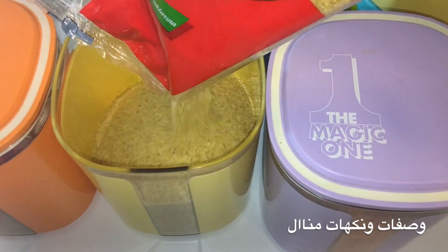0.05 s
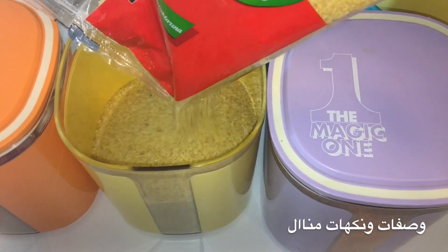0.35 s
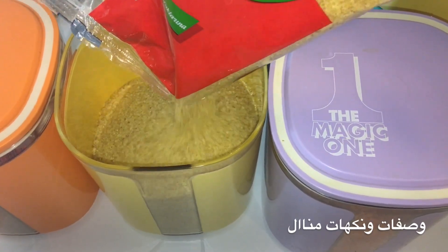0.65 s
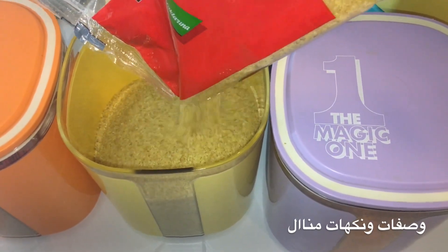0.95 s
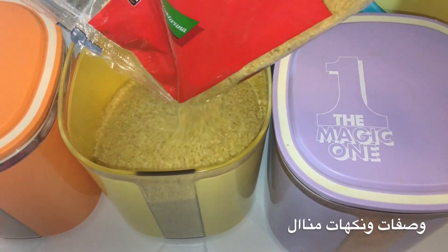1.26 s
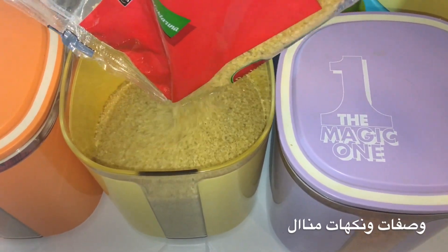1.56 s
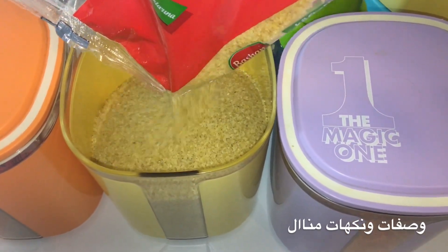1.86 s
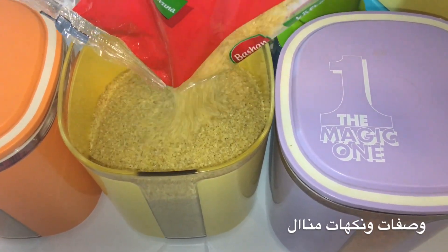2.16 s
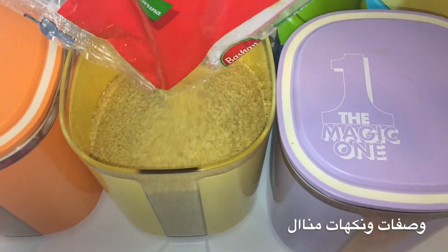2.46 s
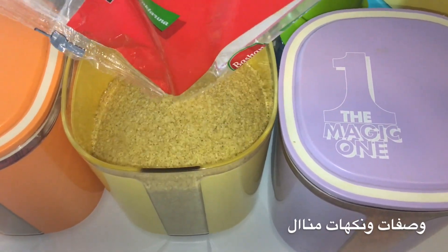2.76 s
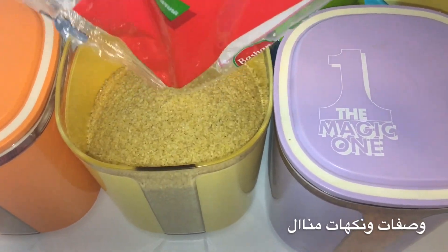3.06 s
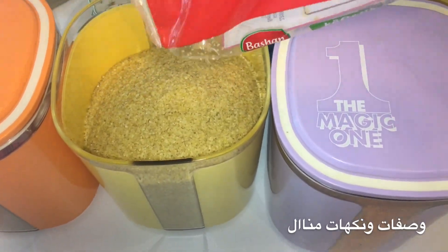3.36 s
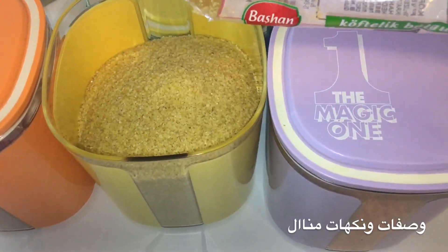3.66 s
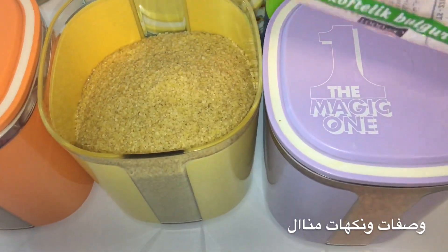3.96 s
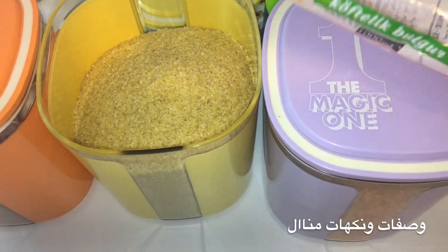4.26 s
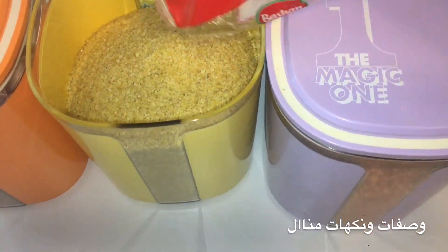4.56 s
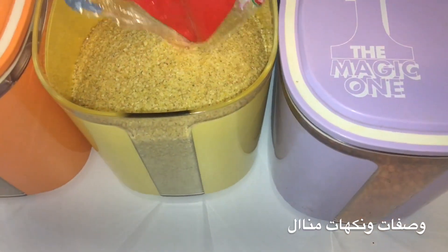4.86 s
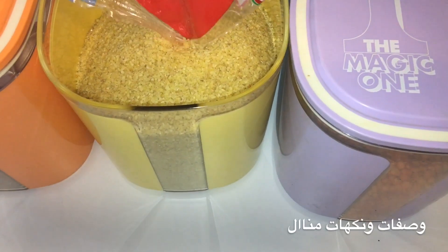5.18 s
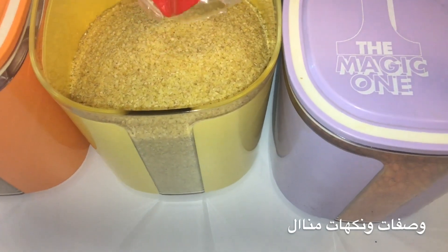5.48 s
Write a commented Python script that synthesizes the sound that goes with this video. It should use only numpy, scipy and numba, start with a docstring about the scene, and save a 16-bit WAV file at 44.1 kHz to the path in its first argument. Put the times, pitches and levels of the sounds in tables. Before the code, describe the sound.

In a small kitchen with little echo, a stream of dry grain hisses into a plastic canister while more slides along the inside of a plastic bag, which snaps now and then. The pour fades and crinkling takes over: irregular jolts of the slack bag, with bright crackles, soft flaps and short spurts of leftover grain. The crackling is strongest near the end, then dies down.

```python
"""In a small kitchen, fine dry grain pours from a plastic bag onto the heap in a plastic canister.
Countless impacts merge into a hiss, and sliding grain drives the resonances of the bag wall.
The stream thins out; the bag is lifted and jolted, and the last grain rustles over the film.
As the bag empties, its slack walls flop and its creases buckle with snaps and crackles.
The room adds faint reverberation, a low rumble and a mains hum."""
import sys
import numpy as np
from scipy import signal
from scipy.fft import rfft, irfft
from scipy.io import wavfile
from numba import njit

SR = 44100
rng = np.random.default_rng(int(sys.argv[2]) if len(sys.argv) > 2 else 0)


def output_pcm(signal):
    """Save a mono or channel-first signal as 16-bit PCM at the path in sys.argv[1].

    Samples are clipped to [-1, 1] before scaling.
    """
    pcm = np.clip(np.atleast_2d(signal).T, -1, 1) * 32767
    wavfile.write(sys.argv[1], SR, np.round(pcm).astype(np.int16))


N = 252472
T = np.arange(N) / SR


def undb(db):
    """Amplitude ratio of a level in decibels."""
    return 10 ** (np.asarray(db) / 20)


def unit(x):
    """Normalisation to rms 1."""
    return x / np.sqrt(np.mean(x ** 2))


def curves(table):
    """Linear interpolation of each column over the first, t/s."""
    times, *columns = np.transpose(table)
    return [np.interp(T, times, column) for column in columns]


def colour(x, response):
    """Minimum-phase filter, by the folded cepstrum of a response (f/Hz, level/dB)."""
    hz, db = np.transpose(response)
    size = 4096
    bin_hz = np.arange(size // 2 + 1) * SR / size
    log_gain = np.log(undb(np.interp(np.log(bin_hz + 1), np.log(hz), db)))
    cepstrum = irfft(log_gain)[:size // 2]
    cepstrum[1:] *= 2
    impulse_response = irfft(np.exp(rfft(cepstrum, size)))
    return signal.fftconvolve(x, impulse_response)[:len(x)]


def passband(x, hz, kind, order=2):
    """Filter with a maximally flat passband."""
    return signal.sosfilt(signal.butter(order, hz, kind, fs=SR, output="sos"), x)


@njit
def resonance(x, hz, width_hz):
    """Damped, driven oscillator whose natural frequency may move."""
    y, band_state, low_state = np.empty(len(x)), 0., 0.
    for i in range(len(x)):
        step, damping = np.tan(np.pi * hz[i] / SR), width_hz / hz[i]
        band = (band_state + step * (x[i] - low_state)) / (1 + step * (step + damping))
        band_state = 2 * band - band_state
        low_state += 2 * step * band
        y[i] = damping * band
    return y


def mode(drive, hz, width_hz):
    """Forced response of two like resonances in cascade, at rms 1."""
    centre = np.full(N, hz, dtype=float)
    return unit(resonance(resonance(drive, centre, width_hz), centre, width_hz))


def walk(rate):
    """Random fluctuation of spread near 1, through `rate` new values a second."""
    steps = rng.standard_normal(N // 10)
    return 1.2 * np.interp(T * rate, np.arange(len(steps)), steps)


def impacts(rate, spread_db):
    """Shot noise: about `rate` clicks a second, most weak, a few strong."""
    hit = rng.random(N) < rate / SR
    strength = undb(spread_db * np.minimum(rng.exponential(size=N), np.log(60)))
    return unit(hit * strength * rng.choice([-1, 1], N))


def add(track, start_s, sound):
    """Superposition of a short sound on a track."""
    i = int(np.clip(start_s * SR, 0, N - 1))
    track[i:i + len(sound)] += sound[:N - i]


def brighten(x, body_db, top_db, split_hz):
    """Crossover: the bands below and above the split take their own levels."""
    bin_hz = np.arange(N // 2 + 1) * SR / N
    top = irfft(rfft(x) / (1 + (split_hz / (bin_hz + 1)) ** 10), N)
    return unit(x - top) * undb(body_db) + unit(top) * undb(top_db)


def stream(hiss_db, spray_db):
    """Impacts on the heap sum incoherently to a hiss and excite a soft resonance of the canister."""
    # spectrum of grain striking grain: f/Hz, level/dB
    impact_spectrum = [(1500, -39), (2500, -4.5), (3200, -1.5), (4200, 5), (5500, 6.5), (6600, 5.5),
                       (7500, 1.5), (8500, 3.5), (9600, 3), (10450, -2), (11300, 0.5), (13000, 2.5),
                       (15800, -3)]
    grains = impacts(rate=22000, spread_db=1.9) * undb(.3 * walk(rate=35))
    thud = mode(grains, hz=150, width_hz=190)
    hiss = brighten(colour(grains, impact_spectrum), hiss_db, spray_db, split_hz=8370)
    return hiss + thud * undb(hiss_db - 19 + 2 * walk(rate=10))


def slide():
    """Friction drives the bag wall, which rings lower when slack; the lifted bag sounds hollow."""
    # response of the wall to sliding grain: f/Hz, level/dB
    wall_spectrum = [(60, -13), (170, -6), (300, -10), (470, -17.5), (680, -5.5), (900, -7.5), (1250, -4),
                     (1750, -1.5), (2250, -0.5), (2800, -12), (4000, -15), (8000, -50)]
    # resonance of the wall: t/s, f/Hz, level/dB relative to the drumming
    wall_ring = [(0, 2100, -16), (1.8, 2050, 2), (2.6, 1960, 0), (3.4, 1490, 1.5), (3.9, 1340, -24),
                 (4.9, 1840, -3)]
    # lift of the bag clear of the canister: t/s, lift (0 to 1)
    bag_lift = [(3.1, 0), (3.5, 0.7), (4.65, 0.8), (4.9, 0.34)]
    ring_hz, ring_db = curves(wall_ring)
    lift, = curves(bag_lift)
    drumming = impacts(rate=4000, spread_db=2.4) * undb(1.6 * walk(rate=60))
    ring = mode(impacts(rate=4000, spread_db=6), ring_hz, width_hz=1040)
    hollow = mode(rng.standard_normal(N), hz=320, width_hz=300)
    return unit(colour(drumming, wall_spectrum)) + undb(ring_db) * ring + lift * undb(-11) * hollow


def room(x, wet_db=-14, t60_s=0.4, dull_hz=8000):
    """Reverberation: diffuse reflections from the walls form a duller, exponentially decaying tail."""
    t = np.arange(SR // 2) / SR
    tail = rng.standard_normal(len(t)) * undb(-60 * t / t60_s) * (t > .003)
    tail = passband(tail, dull_hz, "low", order=1)
    return x + undb(wet_db) * signal.fftconvolve(x, tail / np.linalg.norm(tail))[:N]


def kitchen(mains_hz=50):
    """Ambient noise: a low rumble and a faint mains tone, each slightly modulated in amplitude."""
    # spectrum of the still room: f/Hz, level/dB
    air_spectrum = [(20, -40), (33, -12), (46, 12), (70, 5.5), (130, -3), (250, -8.5), (500, -17),
                    (1500, -22.5), (6000, -36), (16000, -26)]
    air_db, hum_db = -57 + 1.5 * walk(rate=7), -71 + 2 * walk(rate=5)
    air = unit(colour(rng.standard_normal(N), air_spectrum))
    return undb(air_db) * air + undb(hum_db) * np.sin(2 * np.pi * mains_hz * T)


def flops(decay_cycles=0.89, sag=0.46, scuff_db=-7):
    """Heavily damped oscillation: a slack wall swings, slows as it relaxes and scuffs the grain."""
    # swings of the bag walls: t/s, level/dB, mid-glide f/Hz
    wall_swings = [(.124, -34.5, 258), (.278, -33, 211), (.327, -35.5, 264), (.408, -26.5, 935),
                   (.931, -26, 955), (1.076, -30, 265), (1.166, -32, 885), (1.349, -36, 151),
                   (1.419, -31, 950), (2.137, -38.5, 300), (1.954, -40.5, 161), (2.445, -43, 171),
                   (2.501, -38.5, 294), (2.567, -28.5, 175), (2.63, -39.5, 337), (2.987, -35.5, 120),
                   (3.705, -23.5, 810), (3.712, -31.5, 134), (4.004, -38, 800), (4.368, -36.5, 240),
                   (4.74, -27.5, 263), (4.935, -29.5, 234), (4.946, -25, 445), (5.013, -28.5, 180),
                   (5.03, -33.5, 130), (5.144, -42, 710), (5.236, -33.5, 230), (5.385, -37.5, 190),
                   (5.53, -48.5, 259)]
    out, t = np.zeros(N), np.arange(4096) / SR
    for start_s, db, hz in wall_swings:
        age = t * hz / decay_cycles
        swing = (1 - np.exp(-5 * age)) * np.exp(-age)
        glide_hz = hz * (1 + sag * (np.exp(-age) - .5))
        tone = np.sin(2 * np.pi * np.cumsum(glide_hz) / SR)
        scuff = unit(passband(rng.standard_normal(len(t)), [hz * 0.075, hz * 3.7], "band"))
        add(out, start_s, undb(db) * swing / swing.max() * (tone + undb(scuff_db) * scuff))
    return out


def snaps(kick_cycles=0.53, overtone_ratio=1.444, crack_db=-5, shiver_db=-20, shiver_s=0.0035):
    """Snap-through buckling: a facet of film flips and rings in two modes; the sheet around shivers."""
    # the loudest creases giving way: t/s, level/dB, facet f/Hz
    bucklings = [(0.1326, -27, 1530), (.277, -28.5, 1250), (.326, -20, 1800), (0.373, -22, 2100),
                 (.408, -22, 2070), (0.6688, -20.5, 2210), (.9315, -24.5, 1590), (1.2243, -16.5, 1670),
                 (1.3274, -6, 3460), (1.329, -17, 2480), (1.3457, -22, 2160), (2.134, -25, 1740),
                 (2.468, -21.5, 1780), (2.5614, -23, 1760), (2.569, -20.5, 2400), (2.905, -16, 6900),
                 (2.9254, -23.5, 2740), (2.9564, -26, 2650), (2.9983, -9.5, 12300), (3.0245, -17, 7450),
                 (3.074, -26, 1580), (3.1076, -20, 5160), (3.112, -12.5, 8500), (3.1184, -15, 8840),
                 (3.1727, -17, 4670), (3.1734, -20, 1530), (3.2868, -22, 5100), (3.3108, -19, 8600),
                 (3.3517, -11.5, 11800), (3.6963, -17, 1750), (3.706, -15.5, 7000), (3.7064, -17, 1820),
                 (3.8885, -16, 4930), (4.2389, -21.5, 7450), (4.3372, -33.5, 1750), (4.514, -23, 1710),
                 (4.527, -23, 2330), (4.5748, -13.5, 6600), (4.5865, -10.5, 5300), (4.749, -13, 6340),
                 (4.896, -17.5, 2610), (4.9457, -13, 9250), (5.019, -26, 1700), (5.0405, -17.5, 1800),
                 (5.136, -8, 6200), (5.1456, -19, 1320), (5.2285, -8.5, 5660), (5.2343, -9, 9100),
                 (5.244, -15.5, 1900), (5.258, -11, 9500), (5.2692, -8, 7430), (5.2785, -5, 11600),
                 (5.3778, -17.5, 6000), (5.3932, -27, 4600), (5.4116, -14, 12300), (5.4383, -31, 2400),
                 (5.4846, -27, 4220), (5.5548, -16.5, 7200), (5.556, -27.5, 1700), (5.5657, -14, 12700),
                 (5.578, -17, 9700), (5.6195, -26.5, 8550), (5.7082, -33.5, 1840)]
    # tone colour of the snaps as heard in the room: f/Hz, level/dB
    snap_colour = [(600, -2), (1200, -2), (2300, 1), (2850, -5.5), (3600, 0.5), (6000, -0.5), (9000, 1),
                   (10500, -1), (13000, 3.5)]
    out, t = np.zeros(N), np.arange(1024) / SR
    for start_s, db, hz in bucklings:
        crack, shiver = rng.standard_normal((2, len(t)))
        low_hz, high_hz = hz * 0.21, min(hz * 1.55, SR * 3 / 7)
        ring_s = 0.0018 * (1000 / hz) ** 1.24  # larger, lower facets ring longer
        kick = np.exp(-hz * t / kick_cycles)
        swing = (1 - np.exp(-3 * hz * t)) * (kick + np.exp(-t / ring_s))
        swing /= swing.max()
        crack = unit(swing * passband(crack, [low_hz, high_hz], "band")) * np.sqrt(np.mean(swing ** 2))
        ring = np.sin(2 * np.pi * hz * t) - undb(-10) * np.sin(2 * np.pi * hz * overtone_ratio * t)
        # a small facet radiates little below its own pitch
        facet = passband(swing * ring + undb(crack_db) * crack, low_hz, "high")
        sheet = np.exp(-t / shiver_s) * unit(passband(shiver, [min(low_hz, 1300), high_hz], "band"))
        add(out, start_s, undb(db) * (facet + undb(shiver_db) * sheet))
    return colour(out, snap_colour)


def jolts(attack_s=0.024, crackle_decay_ratio=1.35):
    """Levels of rustle and fine crackle: each jolt swells, holds and decays, and their powers add."""
    # jolts that set grain running: t/s, hold/s, decay/(dB/s), level/dB, crackle offset/dB
    bag_jolts = [(2.606, 0.25, 120, -42.5, -0.5), (2.928, 0.012, 128, -43, -1),
                 (3.062, 0.09, 122, -46, 0.5), (3.158, .03, 50, -42.5, -4.5), (3.28, .01, 110, -53.5, 6),
                 (3.353, 0.11, 60, -43, -10), (3.474, 0.11, 67, -43.5, -6), (3.705, 0.0069, 140, -43, -15),
                 (3.809, 0.016, 142, -43, -10), (3.883, .02, 41, -44.5, -5), (4.24, 0.014, 60, -54.5, 5),
                 (4.367, .018, 210, -36, -4), (4.469, 0.024, 80, -43, -6), (4.598, 0.05, 55, -45.5, -10),
                 (4.737, 0.014, 48, -45.5, -19), (4.829, .03, 60, -42, -2), (4.887, 0.042, 108, -40.5, -1),
                 (4.997, 0.076, 78, -35, -4.5), (5.13, 0.074, 107, -44, 4), (5.226, 0.025, 148, -32, -1.5),
                 (5.428, 0.0073, 78, -57.5, -14), (5.57, 0.01, 109, -63, -5)]
    rustle_power, crackle_power = 1e-12, 1e-12
    for start_s, hold_s, decay_db_per_s, db, bright_db in bag_jolts:
        swell = np.clip(1 + (T - start_s) / attack_s, 0, 1)
        fall_db = decay_db_per_s * np.maximum(T - start_s - hold_s, 0)
        rustle_power += (swell * undb(db - fall_db)) ** 2
        crackle_power += (swell * undb(db + bright_db - crackle_decay_ratio * fall_db)) ** 2
    return 10 * np.log10(rustle_power), 10 * np.log10(crackle_power)


def rustle(rustle_db, crackle_db):
    """Modulated shot noise: loose grains trickle over the film in spurts."""
    # spectrum of the rustling film: f/Hz, level/dB
    film_spectrum = [(1500, -16), (2500, -0.5), (3200, -2.5), (4400, 2.5), (5900, 7), (7600, -0.5),
                     (8900, 4.5), (10400, 2), (11500, 8), (13800, 10), (15800, 13)]
    spurts = undb(3.24 * walk(rate=150))
    trickle = impacts(rate=9000, spread_db=2.2) + .35 * impacts(rate=400, spread_db=3)
    return brighten(colour(trickle * spurts, film_spectrum), rustle_db, crackle_db, split_hz=10530)


def crinkle(rustle_db, crackle_db, slide_db):
    """Impulse excitation: tiny creases tick, and the smaller the facet, the higher its resonance."""
    out = np.zeros(N)
    levels_db = np.repeat([slide_db - 6, rustle_db - 10, crackle_db - 2], 2, axis=0)
    for hz, db in zip(np.geomspace(1300, 13500, num=6), levels_db):
        ticks = impacts(rate=140, spread_db=2.6)
        centre = np.full(N, hz)
        ring = resonance(resonance(ticks, centre, 0.76 * hz), centre, 0.77 * hz)
        out += unit(ring) * undb(db)
    return out


def scene(stream_end_s=2.63, fade_s=0.24):
    """Superposition in two like channels: the stream gives way to the nearly empty bag's rustle."""
    # strength of the pour: t/s, hiss level/dB, finest spray level/dB, sliding grain level/dB
    pour = [(0.0, -40.5, -36.7, -43.7), (0.4, -41, -36, -48.5), (0.71, -38, -35.5, -46.5),
            (1.27, -40, -36, -48.5), (1.58, -41, -37.5, -49), (1.9, -39.5, -40.5, -49),
            (2.41, -41.5, -38.7, -50.5), (2.7, -40, -37.5, -43.5)]
    hiss_db, spray_db, full_slide_db = curves(pour)
    rustle_db, crackle_db = jolts()
    empty_slide_db = rustle_db - 6
    flow = np.clip(.5 - (T - stream_end_s) / fade_s, 0, 1)
    wall_gain = flow * undb(full_slide_db) + (1 - flow) * undb(empty_slide_db)
    grain = np.sqrt(flow) * stream(hiss_db, spray_db) + wall_gain * slide()
    film = rustle(rustle_db, crackle_db) + crinkle(rustle_db, crackle_db, empty_slide_db)
    bag = np.sqrt(1 - flow) * film + snaps() + flops()
    return np.tile(room(grain + bag) + kitchen(), (2, 1))


def record(dry):
    """Band limiting: a steep elliptic low-pass removes the highest treble."""
    top_hz = 15900
    return signal.sosfilt(signal.ellip(10, .2, 70, top_hz, fs=SR, output="sos"), dry)


dry = scene()
out = record(dry)
output_pcm(out)
```